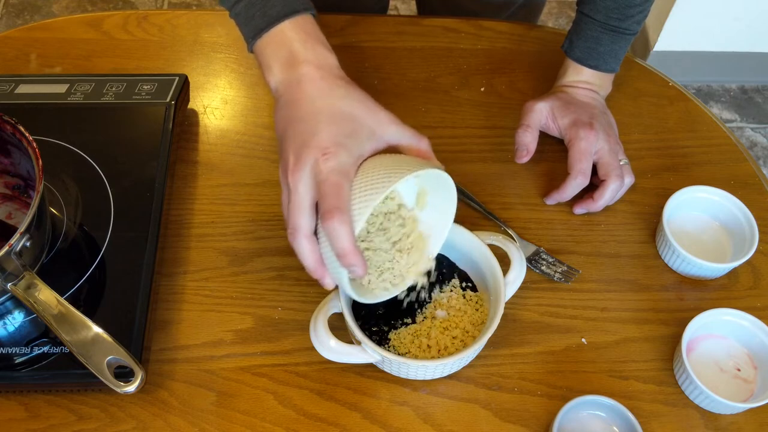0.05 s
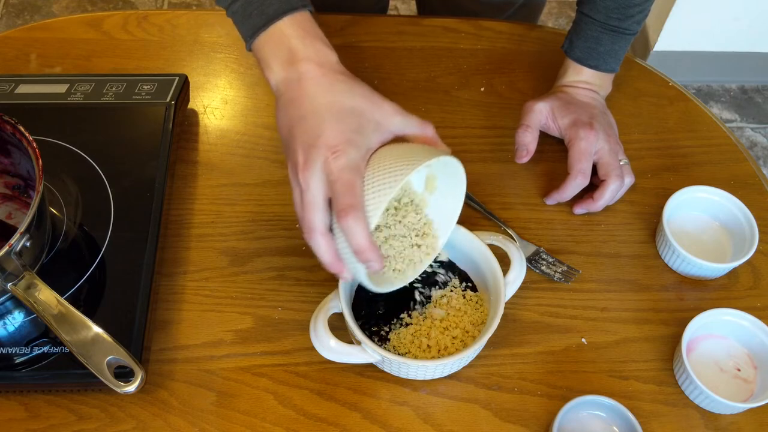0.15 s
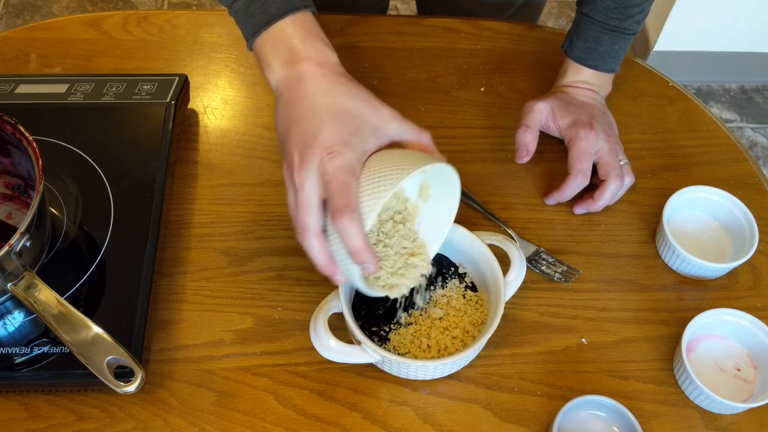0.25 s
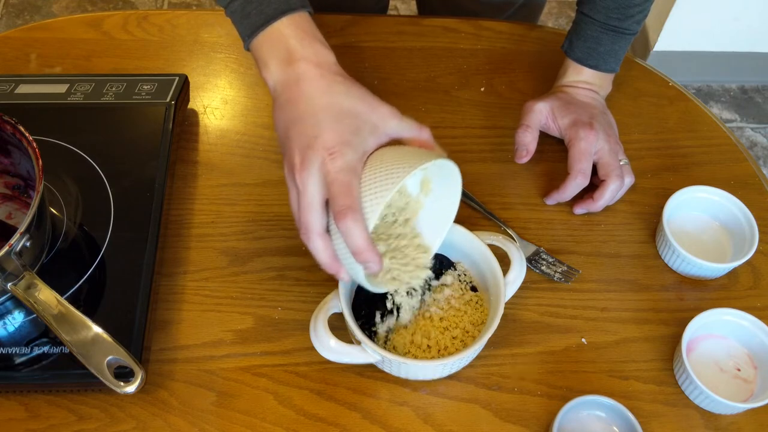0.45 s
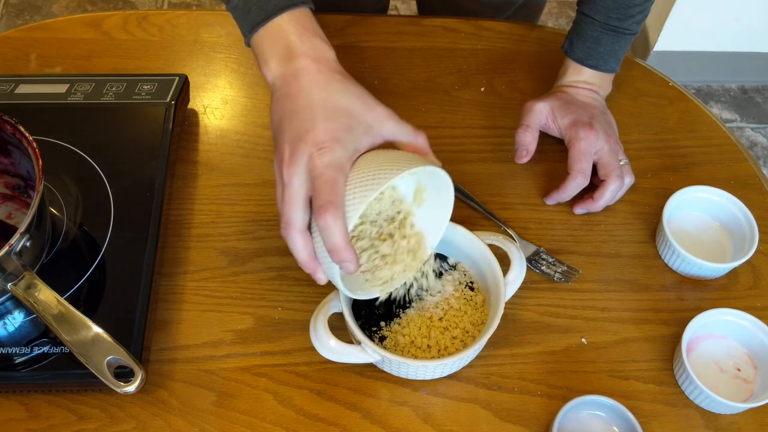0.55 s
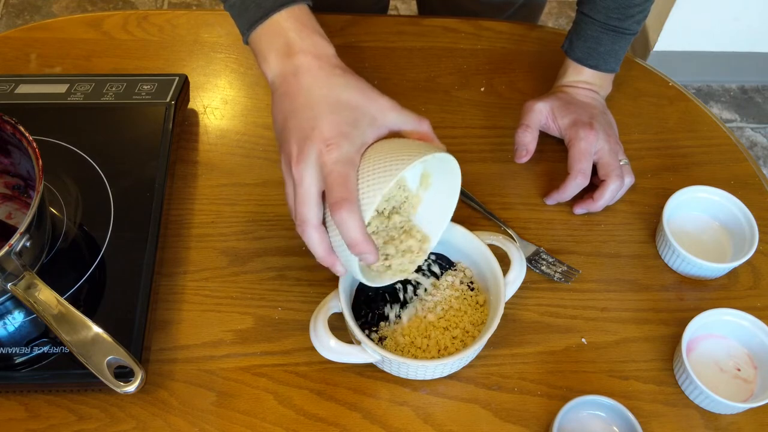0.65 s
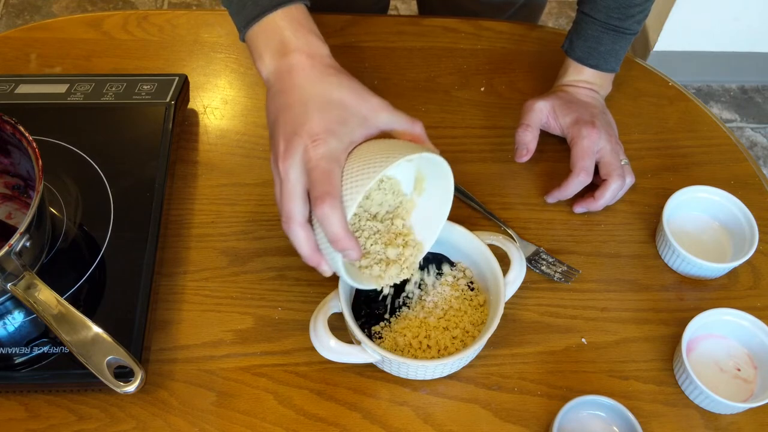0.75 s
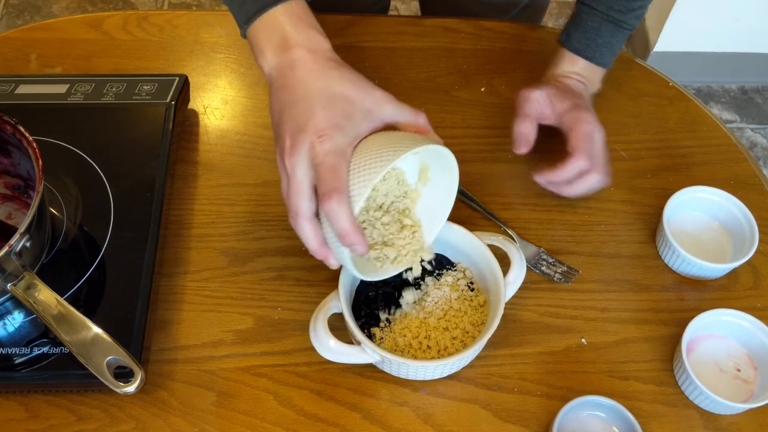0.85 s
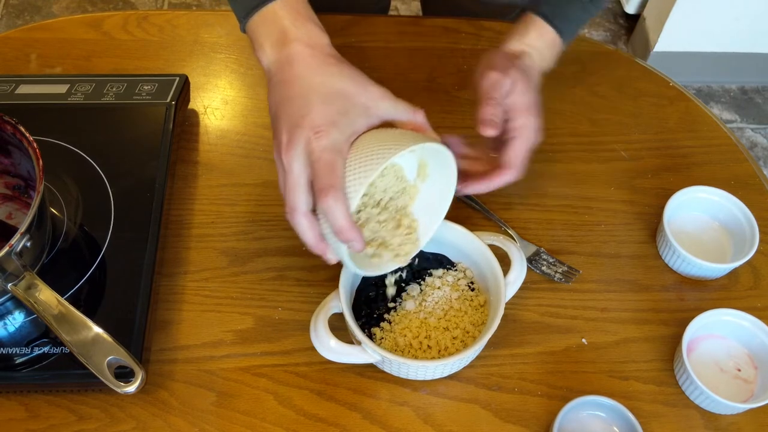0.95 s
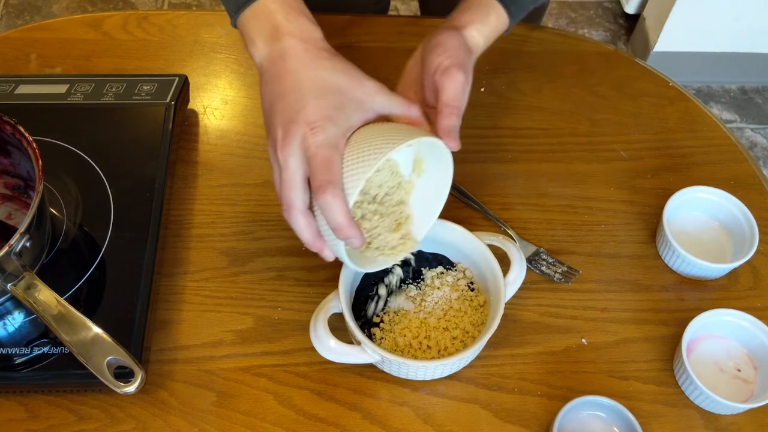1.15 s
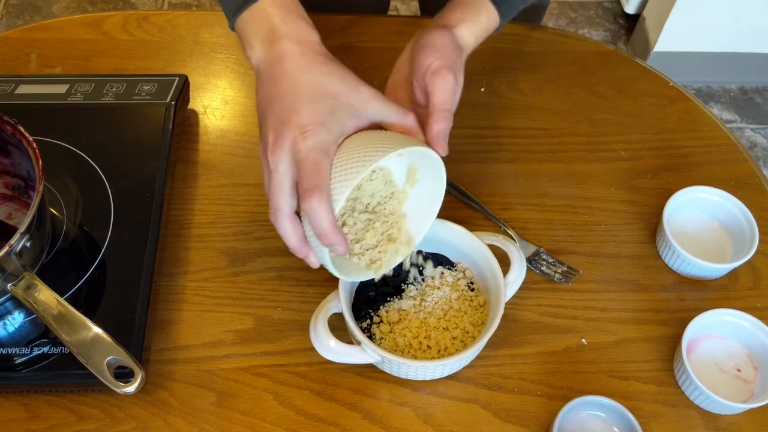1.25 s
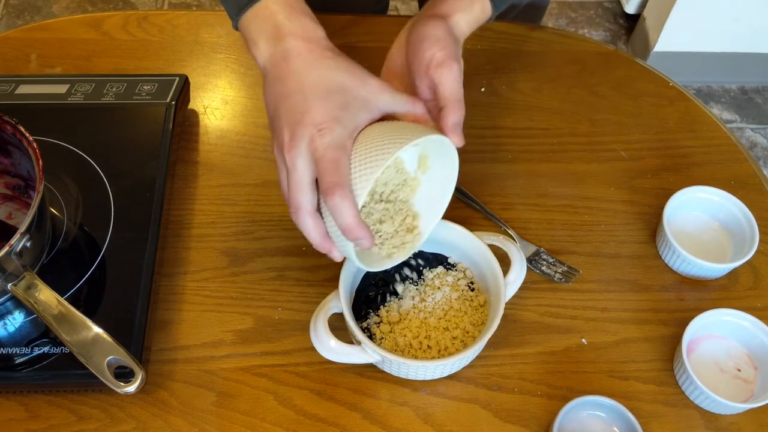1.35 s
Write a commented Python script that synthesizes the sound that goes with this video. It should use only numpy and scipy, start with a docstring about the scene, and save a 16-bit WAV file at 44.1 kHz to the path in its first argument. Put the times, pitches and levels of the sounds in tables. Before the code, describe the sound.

Two ringing clinks of a small ceramic dish against a bowl on a wooden table.

```python
"""A faint slide of crumbs in a quiet kitchen, then two knocks of a ceramic ramekin on the rim of a bowl,
shaking dry crumbs out; the second knock bounces. Each contact rings the china, thumps the wooden
table under the bowl and leaves a short room tail. Afterwards more crumbs slide and a hand brushes
the table. Underneath lie room tone, a faint high whine and a slow sway of air pressure."""
import sys
import numpy as np
from scipy import signal
from scipy.fft import rfft, irfft
from scipy.io import wavfile

SR = 44100
rng = np.random.default_rng(int(sys.argv[2]) if len(sys.argv) > 2 else 0)


def transcribe(signal):
    """Save signal, clipped to [-1, 1], as a 16-bit WAV file at the path in sys.argv[1]."""
    frames = np.atleast_2d(signal).T
    limited = np.clip(frames, -1, 1)
    pcm = np.round(limited * 32767).astype(np.int16)
    wavfile.write(sys.argv[1], SR, pcm)


N = 61739

# hits of the ramekin on the rim: t/s, level/dB, bass shelf/dB, treble tilt/(dB per octave)
CONTACTS = [(0.4938, -6, 0, 1), (0.64557, -1, .5, -2), (0.65197, -3.5, -5.5, .3)]
# ringing modes of the two dishes: f/Hz, level/dB, t60/s, swell/s
CHINA_MODES = [(1214.8, -16.5, 0.31, 0.021), (1185, -28, 0.063, 0.0054), (1363, -18.5, 0.045, 0.0026),
               (1408, -44, .09, 0.0032), (1840, -40.5, .08, 0.0037), (1913, -40, 0.097, 0.0018),
               (2250, -37.5, .07, 0.0018), (2829, -34.5, 0.3, 0.002), (2996, -47, .14, 0.003),
               (3548, -31.5, 0.094, 0.0038), (3750, -53, 0.11, 0.0012), (4090, -47.5, 0.076, 0.00066),
               (5010, -65, 0.38, 0.00079), (5784, -46, 0.081, .001), (5820, -41.5, 0.083, 0.003),
               (6372, -37, 0.039, .001), (7600, -55, 0.036, 0.0012), (7820, -42.5, 0.046, .001),
               (7680, -53, 0.069, 0.0012), (9230, -39, 0.035, .001), (9370, -52, 0.051, 0.00092),
               (9700, -43.5, 0.039, .001), (11600, -56, .04, .001), (12200, -55, 0.033, .001),
               (13400, -52, .03, .001)]
# modes of the table with the bowl on it: f/Hz, level/dB, t60/s
TABLE_MODES = [(82, -69, 0.62), (129.1, -36.5, .4), (169.8, -39.5, .4), (239.3, -22, .25),
               (297.4, -20.5, .24), (351.3, -47, 0.34), (455.3, -24, .22), (482.1, -33, 0.38),
               (560, -40.5, 0.34), (614.5, -34.5, 0.4), (661, -51, 0.6), (836, -37.5, 0.46),
               (925, -28.5, 0.083)]
# EQ of the thump in the wood: f/Hz, relative level/dB
THUMP_EQ = [(40, -23), (75, -4), (130, -1.5), (300, 0.5), (460, 3.5), (680, -14), (1080, -30.5), (1400, -6),
            (1850, -14), (2400, -33.5), (4600, -42.5), (9500, -47), (13000, -58), (15000, -60)]
# reverb tail of the kitchen: f/Hz, relative level/dB, t60/s
KITCHEN_TAIL = [(50, -15, .4), (128, 0, .4), (297, 4.5, 0.3), (506, 5.5, 0.32), (716, -2.5, 0.27),
                (1040, -14, 0.42), (1450, -11, 0.34), (1920, -23, 0.29), (2370, -25.5, 0.33),
                (4550, -43.5, 0.39), (9000, -42.5, 0.34), (16000, -64, .2)]
# slides of crumbs: peak t/s, half length/s, level/dB, centre f/Hz
CRUMB_SLIDES = [(0.133, 0.022, -70, 6000), (0.993, 0.016, -61, 9400), (1.134, 0.099, -71.5, 8500),
                (1.332, 0.018, -62.5, 10100), (1.335, 0.022, -67.5, 6570)]
# strokes of a hand over the table: peak t/s, half length/s, level/dB
HAND_BRUSHES = [(0.987, 0.024, -53.5), (1.122, 0.042, -64.5)]
# EQ of those strokes: f/Hz, relative level/dB
BRUSH_EQ = [(30, -12), (90, 3.5), (200, -13), (330, -10), (600, -27), (1900, -27), (4000, -37)]
# EQ of the still room: f/Hz, relative level/dB
ROOM_EQ = [(20, 1), (35, -8.5), (60, -9), (130, -18.5), (400, -25), (1000, -31), (3000, -35.5), (8000, -39),
           (15500, -41)]

BASS_HZ, TREBLE_HZ = 634, 2080  # EQ corners of the contacts
CHINK_HZ, CHINK_WIDTH_OCT, CHINK_DB, CHINK_T60_S = 8400, .45, -47.5, 0.032
THUMP_GAIN_DB, TABLE_LOWPASS_HZ = 25.5, 893
BEND_LAG_S = 0.001477  # bending waves in the table top arrive this late at 1 kHz, lower ones later
SCATTER_DB, SCATTER_S = -6.5, 0.0061
TAIL_GAIN_DB, TAIL_ATTACK_S = -10, 0.007
SLIDE_WIDTH_OCT, GRAINS_PER_S, GRAIN_SPREAD_DB = 0.27, 5000, 6
ROOM_DB = -52.5
WHINE_HZ, WHINE_WIDTH_OCT, WHINE_DB = 6340, 0.01, -80
SWAY_HZ, SWAY_WIDTH_OCT, SWAY_DB = 5.3, 0.677, -34.5
HIGH_CUT_HZ = 15900


def knocks(t):
    """Each contact drives china, table and room; a hard push is duller, a light bounce has less bass."""
    response = china(t) + table(t) + kitchen(t)
    bass_shelf = 1 / (1 + (freqs() / BASS_HZ) ** 4)
    treble_octaves = np.log2(1 + (freqs() / TREBLE_HZ) ** 2) / 2
    out = np.zeros(N)
    for start, db, bass_db, tilt in CONTACTS:
        i = int(start * SR)
        eq = minimum_phase(db + bass_db * bass_shelf + tilt * treble_octaves)
        out[i:] += filtered(response, eq)[:N - i]
    return out


def china(t):
    """The dishes ring, the main mode swelling as it fills the room; dense glazed-rim modes chink on top."""
    ring = sum(undb(db) * decay(t, t60) * attack(t, swell) * np.sin(2 * np.pi * hz * t)
               for hz, db, t60, swell in CHINA_MODES)
    chink = undb(CHINK_DB) * decay(t, CHINK_T60_S) * noise(bell(CHINK_HZ, CHINK_WIDTH_OCT))
    return ring + chink


def table(t):
    """A thump spreads through the wood treble first, rings its modes and scatters off things on top."""
    bend = np.exp(-4j * np.pi * BEND_LAG_S * np.sqrt(freqs() * 1000))
    thump_eq = undb(THUMP_GAIN_DB) * minimum_phase(curve(THUMP_EQ, freqs()))
    thump = irfft(thump_eq * bend)[:N]
    modes = sum(undb(db) * decay(t, t60) * np.cos(2 * np.pi * hz * t) for hz, db, t60 in TABLE_MODES)
    lowpass = minimum_phase(-10 * np.log10(1 + (freqs() / TABLE_LOWPASS_HZ) ** 8))
    body = filtered(modes, bend * lowpass)
    scatter = unit_rms(rng.standard_normal(N) * t * np.exp(-2 * t / SCATTER_S)) / np.sqrt(N)
    reflections = undb(SCATTER_DB) * filtered(thump, rfft(scatter, 2 * N))
    return reflections - thump - body  # negative: the push is downward


def kitchen(t):
    """The small room answers with a diffuse tail, each half-octave band dying at its own rate."""
    t60_points = np.array(KITCHEN_TAIL)[:, ::2]
    spectrum = rfft(rng.standard_normal(2 * N))
    out = 0
    for hz in np.geomspace(44, 16000, 18):
        bandpass = np.cos(np.pi / 2 * np.clip(2 * np.log2(freqs() / hz), -1, 1)) ** 2
        envelope = decay(t, curve(t60_points, hz)) * attack(t, TAIL_ATTACK_S)
        band = unit_rms(irfft(spectrum * bandpass)[:N] * envelope)
        band *= np.sqrt(np.mean(bandpass) * np.mean(envelope ** 2))  # wider and longer: more energy
        out += undb(curve(KITCHEN_TAIL, hz) + TAIL_GAIN_DB) * band
    return out


def crumbs(t):
    """Tiny dry grains tick at random and blur into short, hissy slides."""
    out = 0
    for when, half, db, hz in CRUMB_SLIDES:
        ticks = rng.random(N) < GRAINS_PER_S / SR
        grains = ticks * rng.standard_normal(N) * undb(GRAIN_SPREAD_DB * rng.standard_normal(N))
        hiss = unit_rms(filtered(grains, bell(hz, SLIDE_WIDTH_OCT)))
        out += undb(db) * hump(t, when, half) * hiss
    return out


def hand(t):
    """A hand brushes the table top: soft swells of low noise."""
    envelope = sum(undb(db) * hump(t, when, half) for when, half, db in HAND_BRUSHES)
    return envelope * noise(undb(curve(BRUSH_EQ, freqs())))


def background():
    """The bed: room tone, a faint wavering whine and slow air pressure on the microphone."""
    sway = signal.windows.tukey(N, .1) * noise(bell(SWAY_HZ, SWAY_WIDTH_OCT))
    room_tone = noise(undb(curve(ROOM_EQ, freqs())))
    whine = noise(bell(WHINE_HZ, WHINE_WIDTH_OCT))
    return undb(ROOM_DB) * room_tone + undb(WHINE_DB) * whine + undb(SWAY_DB) * sway


def undb(db):
    """Decibels to gain."""
    return 10 ** (np.asarray(db) / 20)


def attack(t, rise):
    """Smooth fade-in from 0 to 1."""
    return 1 - np.exp(-(t / rise) ** 2)


def decay(t, t60):
    """Exponential fade, 60 dB down at t60."""
    return np.exp(-np.log(1000) * t / t60)


def hump(x, centre, width):
    """Gaussian rise and fall, peaking at 1."""
    return np.exp(-.5 * ((x - centre) / width) ** 2)


def freqs():
    """Frequency of every spectral bin."""
    return np.maximum(np.arange(N + 1) * SR / (2 * N), 1)


def curve(points, hz):
    """Value between (f/Hz, value) breakpoints on a log-frequency axis."""
    p = np.array(points)
    return np.interp(np.log(hz), np.log(p[:, 0]), p[:, 1])


def bell(hz, octaves):
    """Gain of a smooth band-pass."""
    return hump(np.log2(freqs() / hz), 0, octaves)


def minimum_phase(db):
    """EQ with the given gains and no pre-ring."""
    cepstrum = irfft(np.log(undb(db)))
    cepstrum[1:N] *= 2
    cepstrum[N + 1:] = 0
    return np.exp(rfft(cepstrum))


def filtered(x, gain):
    """A signal through a frequency response."""
    return irfft(rfft(x, 2 * N) * gain)[:N]


def unit_rms(x):
    """Scaled to rms 1."""
    return x / np.sqrt(np.mean(x ** 2))


def noise(gain):
    """Coloured noise of rms 1."""
    return unit_rms(filtered(rng.standard_normal(2 * N), gain))


def scene():
    """Mono mix of all layers."""
    t = np.arange(N) / SR
    return (knocks(t) + crumbs(t) + hand(t) + background())[None]


def record(dry):
    """A steep high cut on the mix."""
    high_cut = signal.ellip(10, .1, 80, HIGH_CUT_HZ, fs=SR, output="sos")
    return signal.sosfilt(high_cut, dry)


dry = scene()
out = record(dry)
transcribe(out)
```